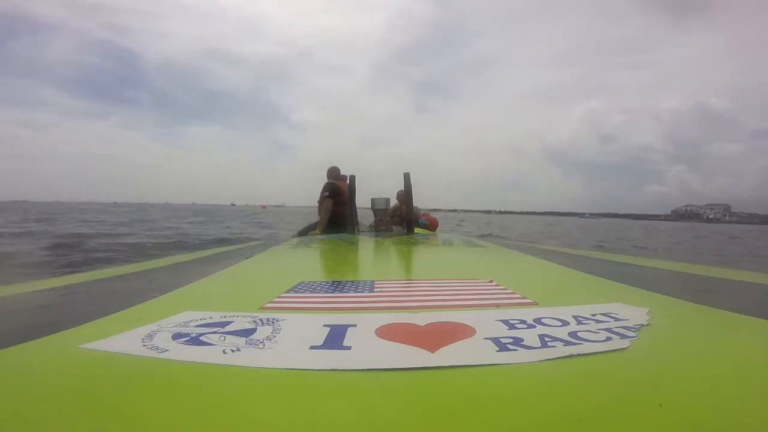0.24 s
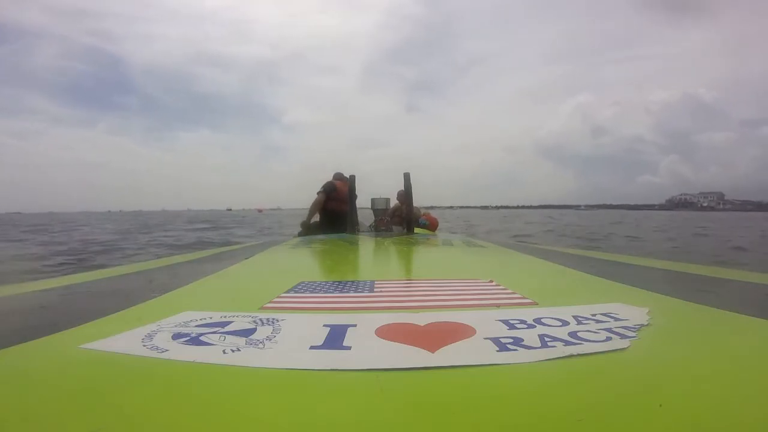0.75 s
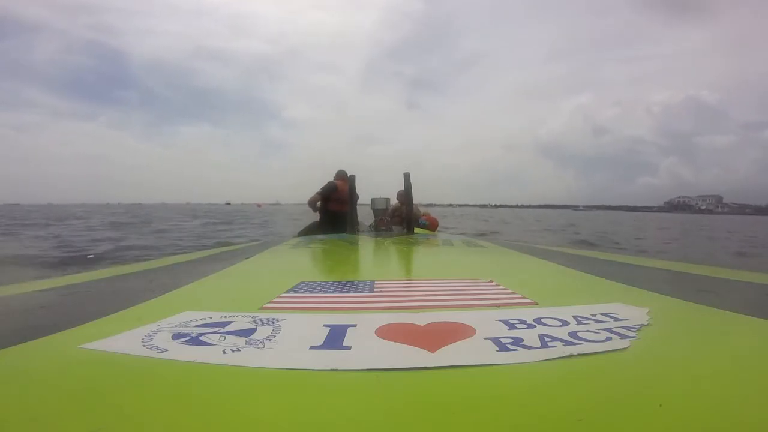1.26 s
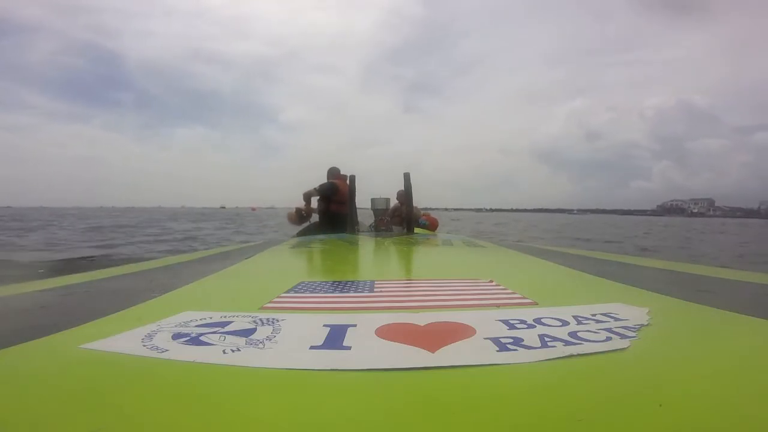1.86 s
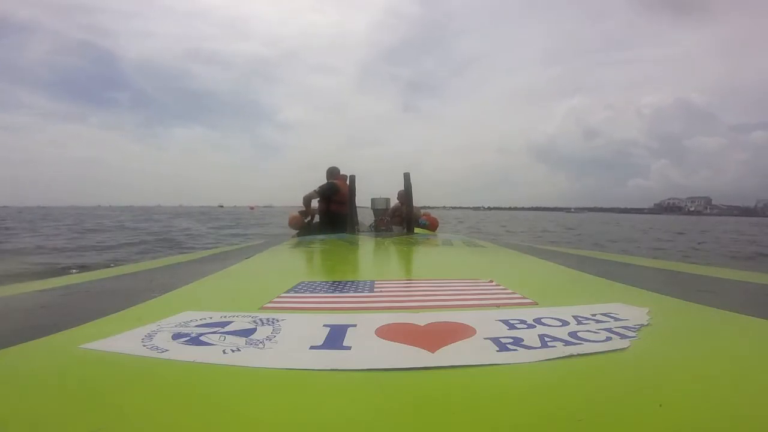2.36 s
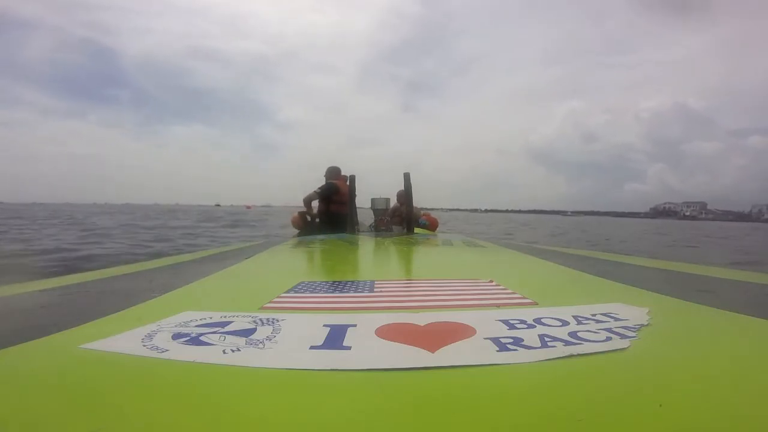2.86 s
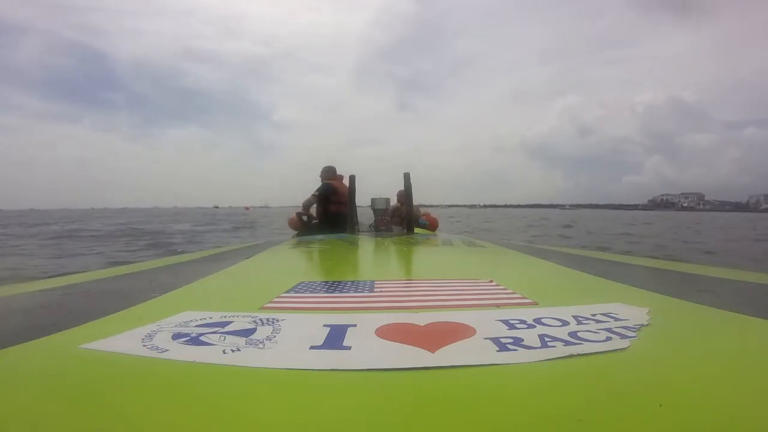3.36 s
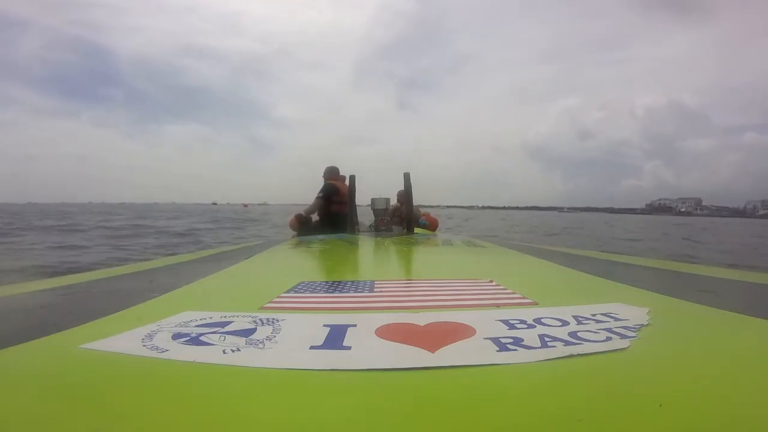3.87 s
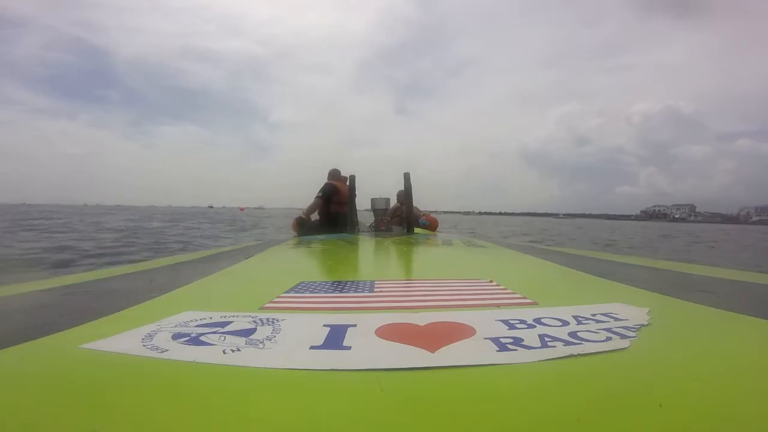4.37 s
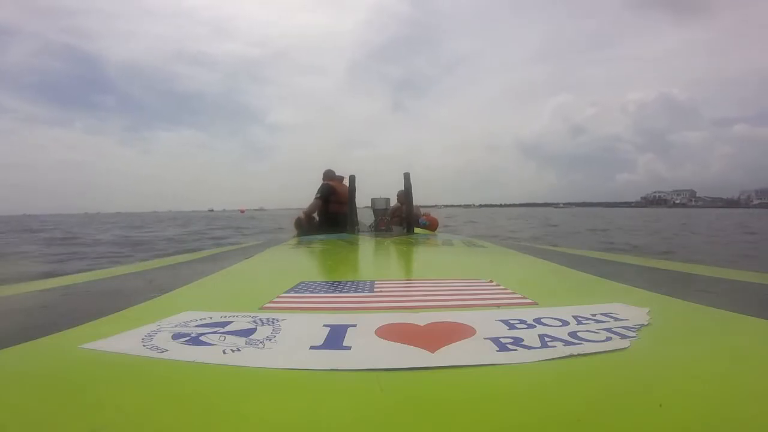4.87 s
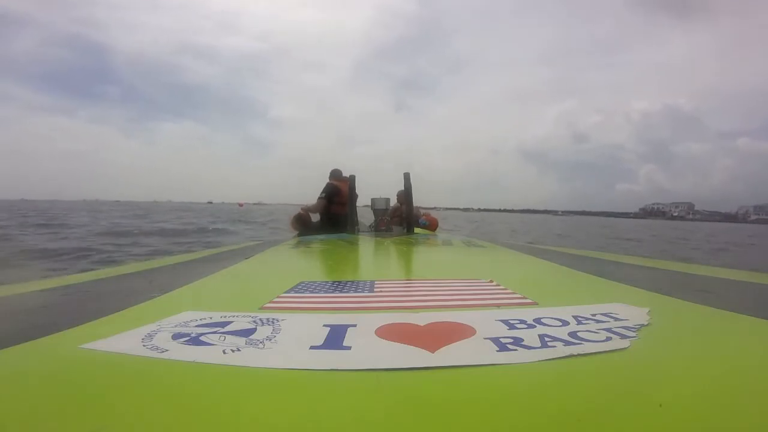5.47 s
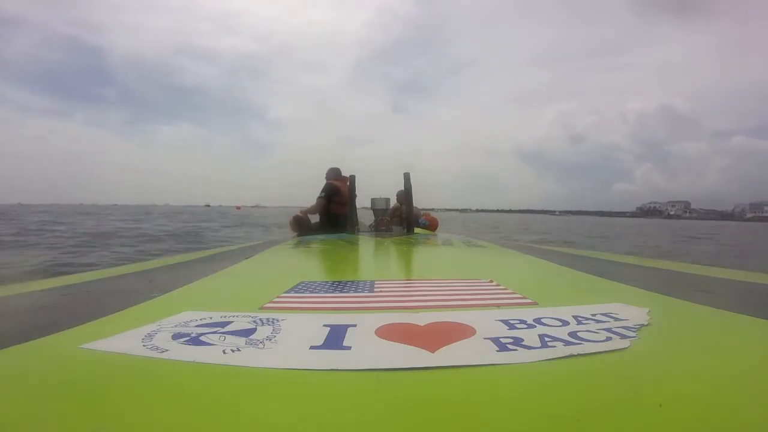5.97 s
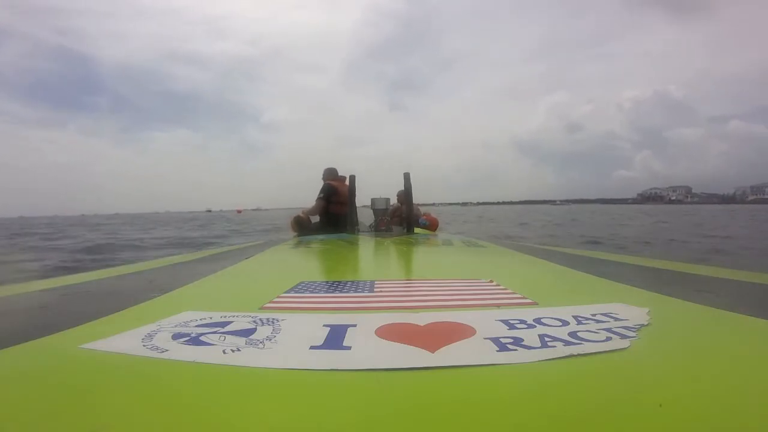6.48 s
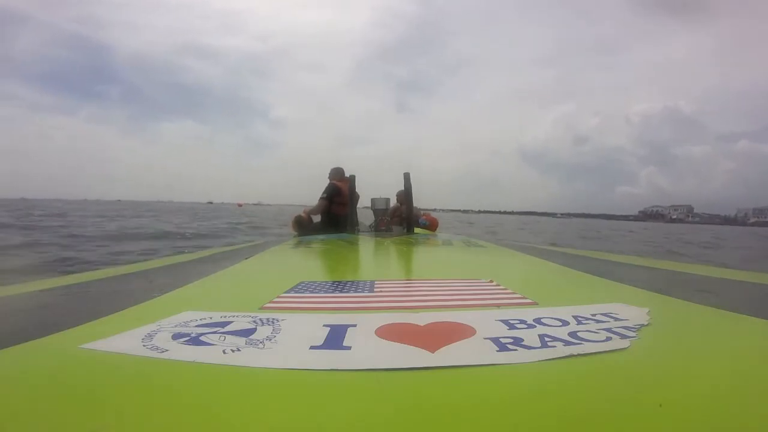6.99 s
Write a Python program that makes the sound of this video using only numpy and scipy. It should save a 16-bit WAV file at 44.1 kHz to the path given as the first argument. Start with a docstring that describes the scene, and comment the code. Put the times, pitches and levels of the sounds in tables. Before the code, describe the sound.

Small choppy waves slap and knock irregularly against a hollow boat hull, with boomy thumps, bubbly gurgles and patter over a faint low wash.

```python
"""Small choppy waves slap a light, hollow boat hull; the microphone sits in a closed case on the deck.
A short cluster opens at 0.3 s and weaker slaps follow from 1.2 s; heavy ones thump at 3.0 s, sharp knocks
sound at 4.4 s, the strongest thump at 5.6 s, and lighter knocks close from 6.2 to 7.2 s. Thumps and knocks
are decaying sines that also drive hull and panel modes; gliding sines make bubbles, resonated random
clicks make spray and patter. A low hull wash and a hiss of far water and recorder last throughout."""
import sys
import numpy as np
from scipy import signal
from scipy.fft import rfft, irfft, next_fast_len
from scipy.io import wavfile

SR = 44100
rng = np.random.default_rng(int(sys.argv[2]) if len(sys.argv) > 2 else 0)


def pcm_store(signal):
    """Save signal as 16-bit PCM."""
    levels = np.round(np.clip(np.atleast_2d(signal), -1, 1) * 32767)
    wavfile.write(sys.argv[1], SR, levels.astype(np.int16).T)


N = 318843

# air pockets closing against the planking: start_s, level_db (peak of the pocket alone),
# pitch_hz (before squeeze and glide), t60_s
AIR_POCKETS = [(0.351, -21, 520, 0.034), (0.377, -28, 310, 0.018), (0.392, -22.5, 335, 0.07),
               (0.501, -47, 495, 0.083), (1.182, -37.5, 440, 0.024), (1.214, -31, 390, 0.013),
               (1.241, -31.5, 610, 0.046), (1.258, -31.5, 303, 0.056), (1.369, -33.5, 612, 0.046),
               (1.425, -41.5, 378, 0.066), (1.515, -36, 576, 0.073), (1.564, -46, 470, 0.042),
               (1.629, -30.5, 460, 0.12), (1.754, -39, 360, 0.036), (1.977, -35.5, 746, 0.026),
               (2.068, -43, 532, 0.15), (2.62, -44.5, 770, 0.074), (2.694, -45, 468, 0.095),
               (2.985, -33.5, 434, 0.19), (2.997, -26, 561, 0.048), (3.029, -30, 485, 0.059),
               (3.075, -38.5, 556, 0.17), (3.149, -32.5, 484, 0.061), (3.177, -27.5, 655, 0.056),
               (3.238, -26.5, 619, 0.052), (3.255, -32, 466, 0.03), (3.797, -37, 380, 0.039),
               (4.212, -24, 445, 0.069), (4.256, -35.5, 514, 0.079), (4.349, -39.5, 478, 0.16),
               (4.376, -13, 446, 0.026), (4.393, -25.5, 375, 0.075), (4.413, -20, 403, 0.019),
               (4.43, -39, 344, 0.066), (4.529, -41, 743, 0.097), (4.752, -41.5, 342, 0.049),
               (5.052, -38, 523, 0.085), (5.126, -41, 287, 0.039), (5.204, -37.5, 343, 0.18),
               (5.305, -28, 465, 0.018), (5.349, -30, 390, 0.014), (5.516, -24.5, 480, 0.029),
               (5.585, -34, 303, 0.14), (5.623, -27.5, 503, 0.12), (5.675, -28, 463, 0.069),
               (5.708, -40.5, 299, 0.099), (5.749, -41.5, 389, 0.17), (5.797, -38, 378, 0.08),
               (5.82, -31.5, 399, 0.038), (5.912, -33.5, 404, 0.085), (5.944, -39, 390, 0.08),
               (6.066, -43, 378, 0.09), (6.171, -21.5, 528, 0.034), (6.193, -32, 469, 0.056),
               (6.601, -27.5, 490, 0.019), (6.829, -37, 544, 0.038), (6.886, -27.5, 347, 0.019),
               (6.918, -38, 434, 0.022), (7.062, -33.5, 351, 0.025), (7.075, -40.5, 613, 0.062)]
# resonances of the whole hull: pitch_hz, level_db (gain at resonance), t60_s
HULL_MODES = [(34.4, -25, 0.94), (47.4, 4, 0.49), (58.1, -29, 0.21), (81.8, 2, 0.29), (108, 0.5, 0.21),
              (136.9, 8.5, 0.53), (211, -5.5, 0.086)]


def from_db(db):
    """The logarithmic level scale: decibels to amplitude gain."""
    return 10 ** (np.asarray(db) / 20)


def rms_one(x):
    """Normalization of mean power: scale to rms 1."""
    return x / np.sqrt(np.mean(x ** 2) + 1e-20)


def at_hz(points, hz):
    """Spectral interpolation: levels in dB read along a log-frequency axis."""
    point_hz, point_db = np.array(points).T
    return np.interp(np.log(hz), np.log(point_hz), point_db)


def strikes(times, levels_db):
    """Impulsive excitation: a train of one-sample clicks."""
    out = np.zeros(N)
    at = np.clip((np.asarray(times) * SR).astype(int), 0, N - 1)
    np.add.at(out, at, from_db(levels_db))
    return out


def ring(drive, hz, t60):
    """Damped oscillator: a unit click starts a decaying sine of initial height 1."""
    radius = from_db(-60 / (t60 * SR))
    angle = 2 * np.pi * hz / SR
    feedback = [1, -2 * radius * np.cos(angle), radius * radius]
    return signal.lfilter([0, np.sin(angle)], feedback, drive + 1e-18)


def resonate(drive, modes):
    """Modal superposition: a body answers a push with all its damped modes, alternating in sign."""
    out = 0
    for k, (hz, db, t60) in enumerate(modes):
        unit_gain = 2 * np.log(1000) / (t60 * SR)      # brings the gain at resonance to about 1
        out = out + from_db(db) * unit_gain * ring(drive, hz, t60) * (-1) ** k
    return out


def pockets(rows, rises, glide, squeeze=0., lead_s=0.):
    """Volume oscillation of trapped air: each pocket swells in, then rings, glides and dies away."""
    out = np.zeros(N + SR)
    for (s, db, hz, t60), rise in zip(rows, rises):
        t60 = np.clip(t60, .008, .5)
        t = np.arange(int(t60 * SR)) / SR
        shape = (1 - np.exp(-t / max(rise, 1e-4))) ** 2 * from_db(-60 * t / t60)
        # a squeezed pocket is stiffer, so it starts higher
        pitch = hz * (1 + squeeze * np.exp(-t / 0.0019) + glide * t / t60)
        tone = np.sin(2 * np.pi * np.cumsum(pitch) / SR)
        at = max(round((s - lead_s) * SR), 0)
        out[at:at + len(t)] += from_db(db) * shape / shape.max() * tone
    return out[:N]


def thumps():
    """Forced vibration: a booming air cushion and a slow shove leave the long hull modes ringing."""
    # heavy slaps: start_s, level_db (peak of the cushion alone), pitch_hz (before the glide), t60_s
    heavy_slaps = [(0.383, -22.5, 141, 0.018), (0.41, -22.5, 120.4, 0.09), (1.214, -38, 129.6, 0.16),
                   (1.242, -36, 131, 0.072), (3.002, -19.5, 123.5, 0.061), (3.016, -15.5, 69, 0.18),
                   (3.071, -21.5, 76, 0.053), (3.116, -24.5, 48, 0.11), (3.675, -30, 163, 0.056),
                   (3.701, -33.5, 108, 0.11), (3.801, -31, 105, 0.068), (3.878, -37.5, 113, 0.067),
                   (4.214, -39, 113, 0.37), (4.383, -30, 123, 0.099), (4.418, -31.5, 78, 0.077),
                   (4.63, -37, 124, 0.1), (5.127, -28.5, 161, 0.069), (5.149, -29, 108, 0.19),
                   (5.213, -26.5, 145.6, 0.067), (5.258, -28, 130, 0.11), (5.579, -10, 91, 0.068),
                   (5.625, -17, 120.9, 0.3), (5.685, -33, 92, 0.11), (5.737, -30.5, 61.9, 0.054),
                   (6.169, -38, 102.6, 0.27), (6.871, -37, 95.5, 0.15), (7.193, -41, 117, 0.26)]
    rise_cycles, rise_growth = 0.36, 0.13      # at mean level; dB of rise time per dB of peak
    shove_db, shove_max_db, shove_s = -2.5, -18, 0.01      # click level re peak, its ceiling, pulse length
    s, db, hz, _ = np.transpose(heavy_slaps)
    rises = rise_cycles / hz * from_db(rise_growth * (db - db.mean()))
    push = pockets(heavy_slaps, rises, glide=-0.26)
    clicks = strikes(s, np.minimum(db + shove_db, shove_max_db))
    shove = np.convolve(clicks, np.hanning(int(shove_s * SR)))[:N]
    return push + resonate(from_db(-3.5) * push + shove, HULL_MODES)


def knocks():
    """Impact excitation: a pocket's ring and a short rough slap of water shake the panels."""
    # resonances of the panels: pitch_hz, level_db (gain at resonance), t60_s
    panel_modes = [(296, -5.5, 0.029), (378, -2, 0.086), (404.3, -6, 0.36), (464, -25, 0.34),
                   (576, -12.5, 0.17), (680, -11.5, 0.039)]
    rows = np.array(AIR_POCKETS)
    push = pockets(rows, np.full(len(rows), .003), glide=-0.16, squeeze=0.51, lead_s=0.0012)
    slap_t60_s = 0.072
    clicks = strikes(rows[:, 0], rows[:, 1])
    slap = signal.lfilter([1], [1, -from_db(-60 / (slap_t60_s * SR))], clicks)
    slap = slap * rng.choice([-1, 1], N)      # random signs make it rough
    return push + resonate(from_db(0.5) * push + from_db(16.5) * slap, panel_modes)


def bubbles():
    """Bubble resonance: small air volumes ring for a few dozen cycles and rise a little in pitch."""
    # single bubbles heard above the patter: start_s, level_db (peak), pitch_hz (before the glide)
    single_bubbles = [(0.2643, -41, 2700), (0.3379, -32.5, 1710), (0.349, -27.5, 995), (0.376, -35, 1390),
                      (0.4484, -33.5, 2190), (0.5248, -35, 1490), (0.5587, -39.5, 2170),
                      (1.2454, -42.5, 1030), (1.4436, -40, 1400), (1.46, -47, 2250), (1.595, -44, 1600),
                      (1.658, -41, 1240), (1.736, -43, 1200), (1.748, -38.5, 1080), (1.781, -50, 2900),
                      (1.857, -37, 2140), (1.8743, -38.5, 990), (1.942, -43, 2150), (1.979, -38, 1156),
                      (2.0028, -36.5, 1385), (2.1321, -40.5, 2220), (2.619, -34, 1464), (2.9701, -38, 980),
                      (2.995, -35.5, 2950), (3.0006, -30.5, 1130), (3.065, -36, 2060),
                      (3.0754, -27.5, 1010), (3.1744, -39, 975), (4.2172, -35, 1225), (4.2403, -46, 1820),
                      (4.2406, -44, 2650), (4.332, -43.5, 1580), (4.4109, -38, 1000), (4.5048, -31, 1110),
                      (4.52, -32, 1920), (4.552, -35, 1710), (4.64, -51, 2840), (4.7077, -43.5, 1780),
                      (4.824, -48, 2930), (5.262, -44, 2340), (5.3018, -40, 1880), (5.348, -38.5, 2090),
                      (5.35, -35, 753), (5.554, -43, 2900), (5.5767, -45, 1540), (5.5817, -33.5, 1640),
                      (5.675, -28.5, 1424), (5.746, -32.5, 1476), (5.785, -41.5, 1800), (5.896, -40, 1810),
                      (5.929, -42.5, 1040), (6.127, -42.5, 1130), (6.1712, -41, 957), (6.332, -43.5, 1010),
                      (6.3998, -30, 1845), (6.6465, -39, 2450), (6.8124, -38.5, 2550), (6.8146, -38, 2900),
                      (6.8857, -36, 1134), (6.94, -43.5, 3400), (6.9616, -37.5, 2110), (6.9616, -39, 2900),
                      (6.985, -41, 2900), (7.015, -47, 1820), (7.074, -45, 1080), (7.1477, -41, 1860),
                      (7.195, -45.5, 1740)]
    cycles = 36.0      # to die by 60 dB
    rows = [(s, db, hz, cycles / hz) for s, db, hz in single_bubbles]
    return pockets(rows, np.full(len(rows), .002), glide=0.05, lead_s=0.00125)


def spray():
    """Superposed random impacts: droplets burst with splashes and knocks; sparser patter runs off."""
    # sheets of water breaking on the planking: start_s, level_db (before rise and decay), t60_s,
    # top_db (finest spray re level_db)
    water_sheets = [(0.2597, -35, 0.043, -20), (0.3348, -40, 0.6, -21), (0.376, -37, 0.16, -14.5),
                    (0.446, -46, 0.22, -16), (0.5234, -36, 0.055, -15), (0.56, -61, 0.045, -25),
                    (1.243, -48, .1, -20), (1.445, -40, 0.061, -13), (1.6591, -42.5, 0.27, -20),
                    (1.7015, -50, 0.11, -17), (1.736, -42, 0.12, -17), (1.9765, -35, 0.27, -26),
                    (2.002, -41, 0.38, -16), (2.397, -41, 0.03, -19), (2.622, -47.5, 0.13, -30),
                    (2.959, -38.5, 0.05, -2), (2.9718, -32, 0.097, -12.5), (3.0021, -33, 0.12, -19),
                    (3.049, -33.5, 0.095, -30), (3.0778, -31, 0.14, -20.5), (3.175, -43.5, 0.2, -16),
                    (3.2375, -51, 0.059, -24), (4.2088, -33, 0.082, -27), (4.239, -37.5, 0.11, -29),
                    (4.331, -42, 0.11, -22), (4.372, -53, 0.039, -26), (4.412, -35.5, 0.13, -29),
                    (4.507, -33.5, 0.16, -27), (4.5314, -37.5, 0.17, -24), (5.262, -38.5, 0.05, -27),
                    (5.3023, -43, 0.12, -26), (5.345, -45, 0.075, -28), (5.408, -41.5, 0.25, -32),
                    (5.5546, -51.5, 0.11, -6), (5.5764, -28, .11, -19.5), (5.6166, -47, 0.27, -35),
                    (5.6717, -27, 0.091, -24), (5.724, -43.5, 0.15, -11), (5.745, -49, 0.13, -34),
                    (6.1706, -35, .072, -36), (6.399, -42, 0.12, -30), (6.5984, -49.5, 0.29, -24),
                    (6.647, -37, 0.061, -29), (6.8144, -46.5, 0.31, -16), (6.8568, -43.5, 0.23, -19),
                    (6.888, -31.5, .036, -32), (6.938, -42.5, 0.23, -30), (7.013, -37, 0.044, -18),
                    (7.1467, -52, 0.062, -22)]
    # spectrum of the droplets: pitch_hz, level_db (relative)
    droplet_colour = [(300, -13.5), (500, -2), (800, -4.5), (1100, 2.5), (1500, 1.5), (2000, 3.5),
                      (2500, -1), (3000, -0.5), (3300, -11.5)]
    rise_s, top_extra_fall_db = 0.0024, 39      # the extra fall is per t60
    burst_per_s, mist_per_s, patter_per_s = 2600.0, 1500.0, 1500.0      # droplets
    # each knock throws a little water: level re the knock, t60 0.026 s, top -21 dB
    thrown = [(s, db - 16.5, 0.026, -21) for s, db, _, _ in AIR_POCKETS]

    body, top = np.zeros((2, N + SR))
    for s, db, t60, top_db in list(water_sheets) + thrown:
        t = np.arange(int(np.clip(t60, .01, .6) * SR)) / SR
        shape = (1 - np.exp(-t / rise_s)) * from_db(db - 60 * t / t60)
        at = round((s - .005) * SR)      # the sheet thickens before its peak
        body[at:at + len(t)] += shape
        # the finest spray dies first
        top[at:at + len(t)] += shape * from_db(top_db - top_extra_fall_db * t / t60)

    low, high = np.geomspace(300, 3300, 24), np.geomspace(3500, 6000, 6)      # droplet pitches, Hz
    colour = at_hz(droplet_colour, low)
    mist_colour = -12.0 * np.log2(high / high[0])      # dB, falling per octave
    patter_colour = colour + 2.2 * np.log2(low / low[0])
    burst = droplets(body[:N], burst_per_s, 28.0, low, colour)
    mist = droplets(top[:N], mist_per_s, 25.0, high, mist_colour)
    # drops fall in small groups, each 350 samples long
    clumps = from_db(1.18 * np.repeat(rng.standard_normal(N // 350 + 1), 350)[:N])
    patter = droplets(clumps * runoff(), patter_per_s, 38.0, low, patter_colour)
    return burst + mist + patter


def droplets(strength, per_s, cycles, pitches, levels_db):
    """Shot noise through resonators: random droplets swell over a few cycles, then ring out."""
    sizes = from_db(2.86 * np.minimum(rng.exponential(1, N), 4)) * rng.choice([-1, 1], N)
    births = sizes * (rng.random(N) < per_s / SR)
    dealt = rng.integers(0, len(pitches), N)      # which pitch each droplet gets
    strengths = np.array([np.ones(N), strength])      # a steady copy serves as the level reference
    total = np.zeros((2, N))
    for k, (hz, db) in enumerate(zip(pitches, levels_db)):
        clicks = births * (dealt == k) * strengths
        swelling = ring(clicks, hz, cycles / hz)
        total += from_db(db) * hz * ring(swelling, hz, 8.7 / hz)
    steady, played = total
    return played / steady.std()


def runoff():
    """Power addition: each run-off swells, holds and drains away over a faint lapping."""
    # water running off after a wave: start_s, hold_s (from the start), level_db (patter while held)
    drainings = [(0.317, 0.16, -49), (1.402, 1, -57), (1.92, 0.18, -57.5), (2.944, 0.2, -50),
                 (4.348, 0.48, -53), (5.204, 0.58, -54), (5.551, 0.21, -49), (5.85, 0.45, -64.5),
                 (6.79, 0.16, -53), (7.0, .3, -61)]
    rise_s, fall_db_per_s, lapping_db = 0.02, 67, -67.5
    t = np.arange(N) / SR
    power = from_db(lapping_db) ** 2
    for s, hold, db in drainings:
        drain_db = fall_db_per_s * np.maximum(t - s - hold, 0)
        swell_in = np.clip((t - s) / rise_s, 0, 1)
        power = power + (swell_in * from_db(db - drain_db)) ** 2
    return np.sqrt(power)


def wash():
    """Random excitation: lumpy low pressure from the swell keeps the hull modes murmuring."""
    wash_db = -56      # rms
    lump_db = 4.6 * np.repeat(rng.standard_normal(N // 900 + 1), 900)[:N]      # steps of 900 samples
    lumps = rng.standard_normal(N) * from_db(lump_db)
    return from_db(wash_db) * rms_one(resonate(lumps, HULL_MODES))


def floor():
    """Spectral shaping of white noise: the steady hiss of far water and the recorder."""
    # spectrum of the hiss: pitch_hz, level_db (relative spectral density)
    hiss_colour = [(12, -44), (20, -3), (118, -0.5), (248, -8.5), (409, -9.5), (554, -13.5), (2210, -25.5),
                   (3850, -28.5), (12000, -45.5), (15000, -53)]
    floor_db = -50      # rms
    size = next_fast_len(N)
    hz = np.maximum(np.arange(size // 2 + 1) * SR / size, 1)
    spectrum = rfft(rng.standard_normal(size)) * from_db(at_hz(hiss_colour, hz))
    return from_db(floor_db) * rms_one(irfft(spectrum, size)[:N])


def scene():
    """Linear superposition: all layers add at one microphone."""
    return (thumps() + knocks() + bubbles() + spray() + wash() + floor())[None]


def record(dry):
    """Band limitation: a steep elliptic low-pass removes the top."""
    cutoff_hz = 15050
    low_pass = signal.ellip(12, .5, 60, cutoff_hz, fs=SR, output="sos")      # ripple and stopband in dB
    return signal.sosfilt(low_pass, dry)


dry = scene()
out = record(dry)
pcm_store(out)
```